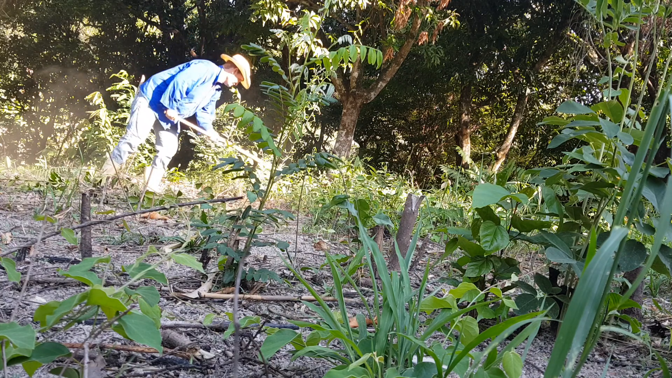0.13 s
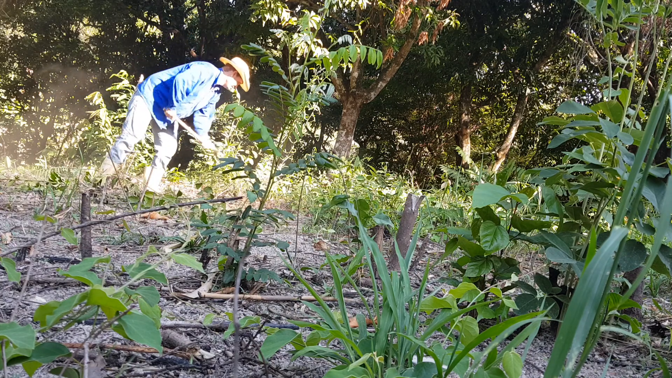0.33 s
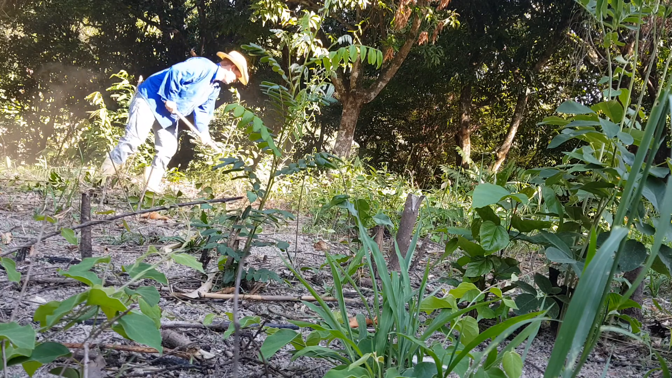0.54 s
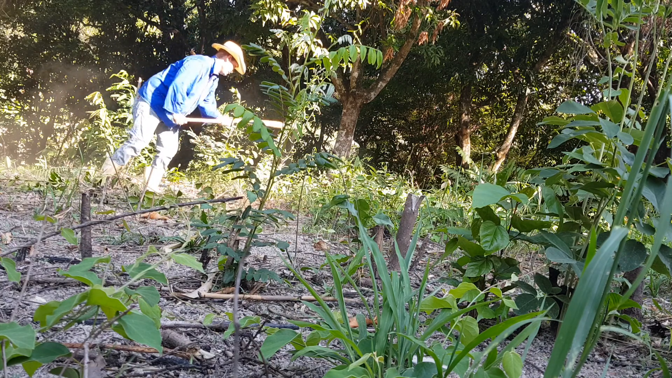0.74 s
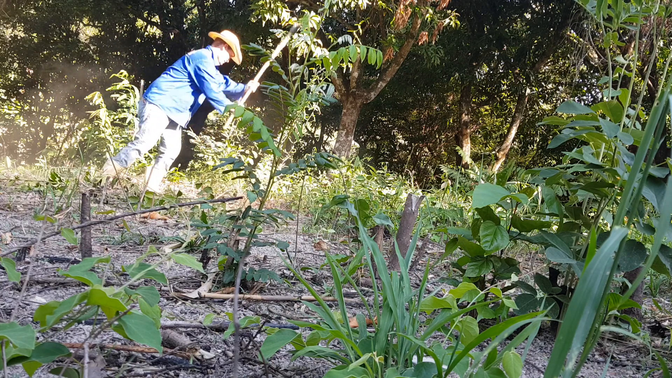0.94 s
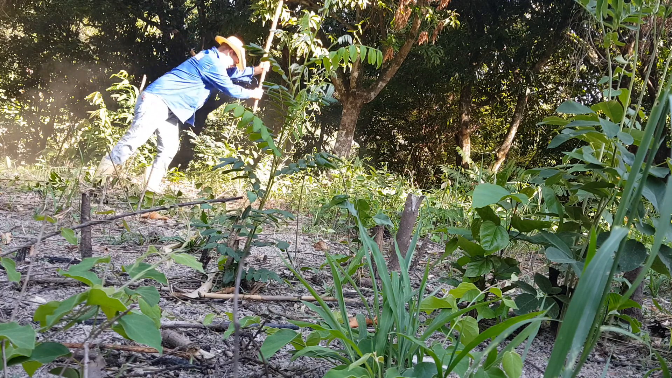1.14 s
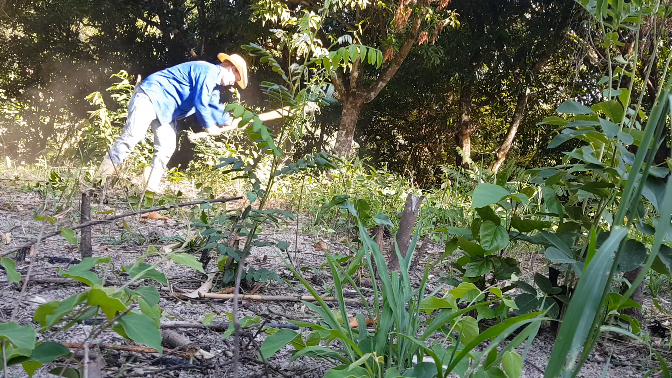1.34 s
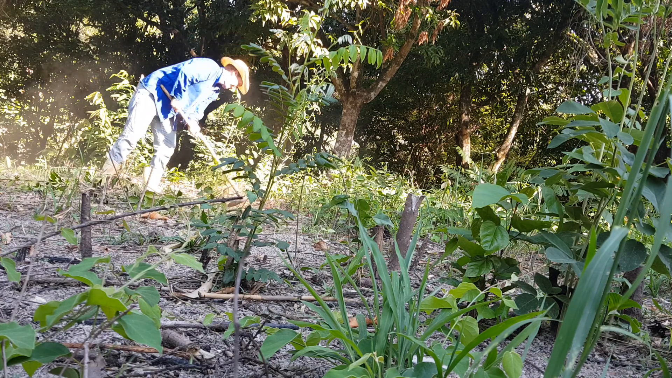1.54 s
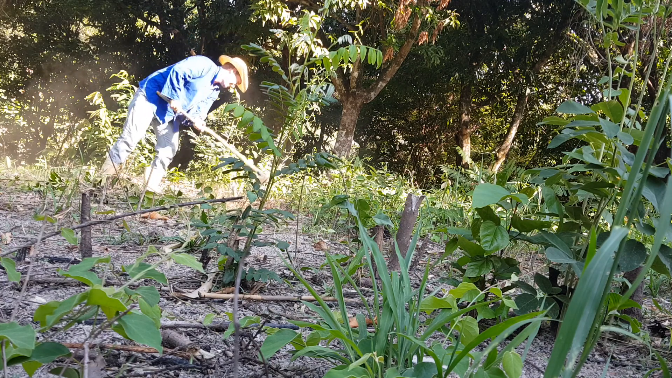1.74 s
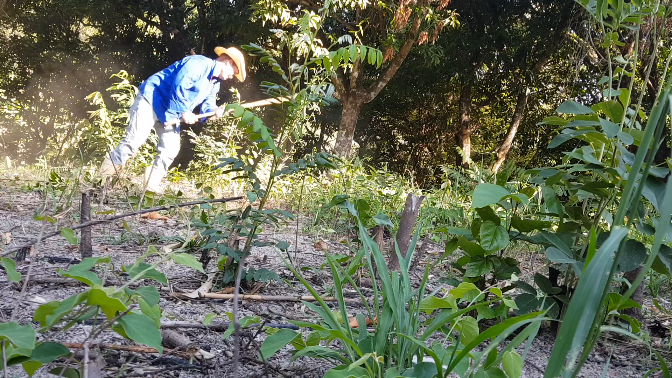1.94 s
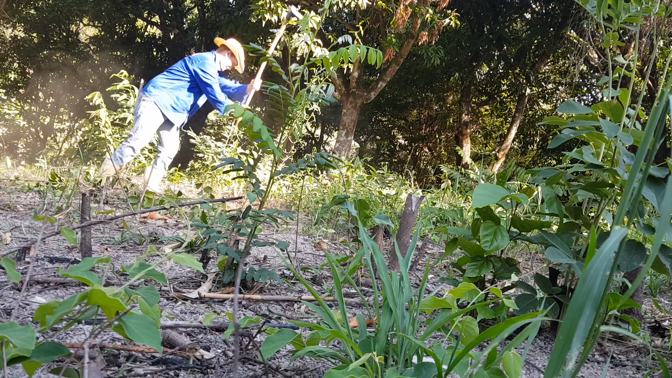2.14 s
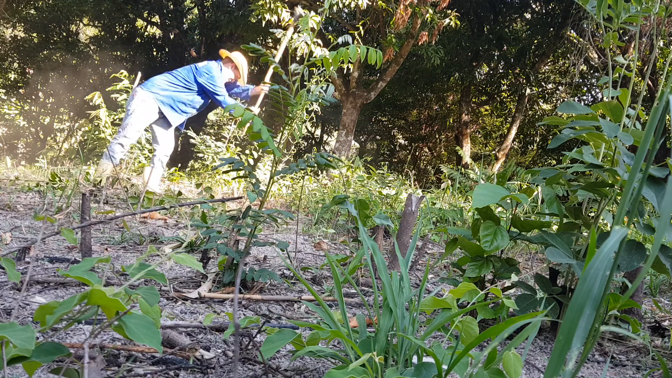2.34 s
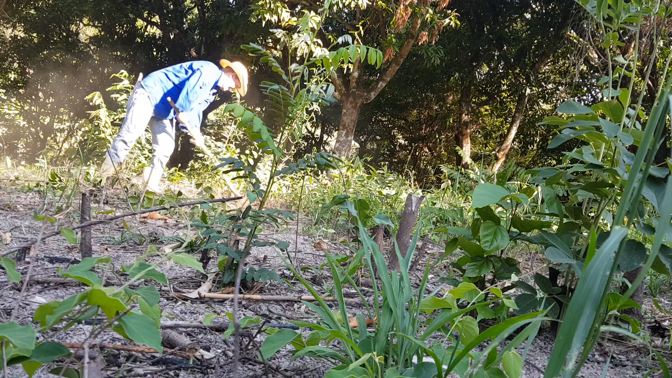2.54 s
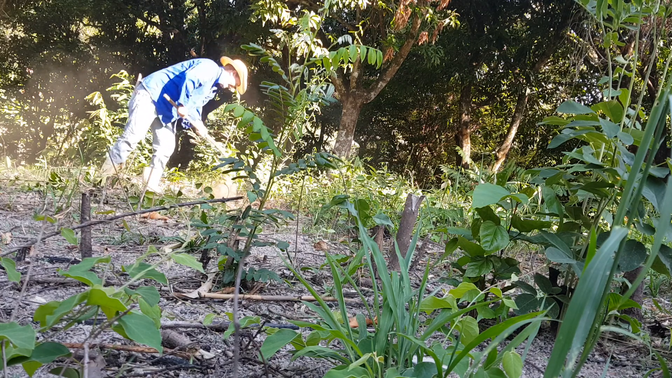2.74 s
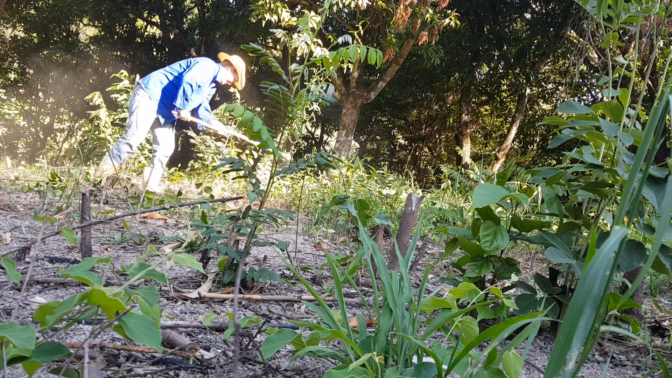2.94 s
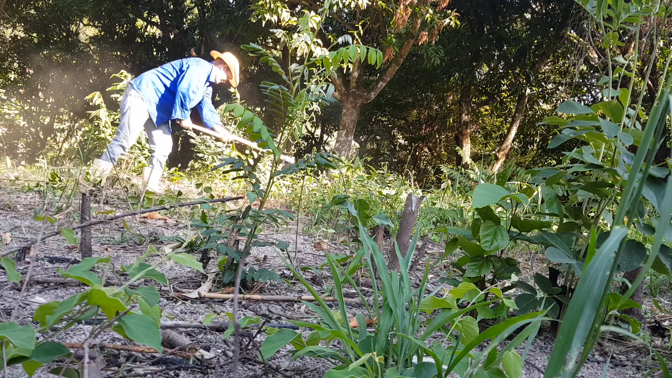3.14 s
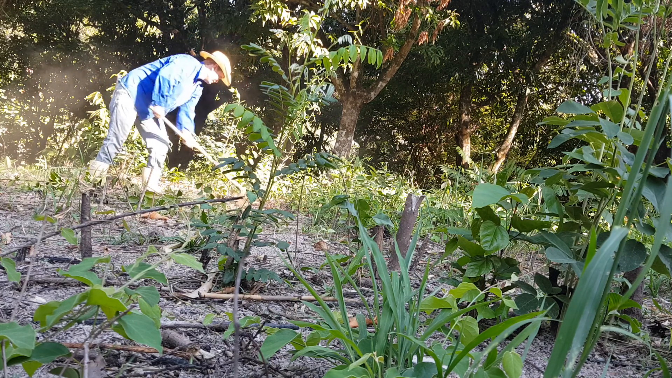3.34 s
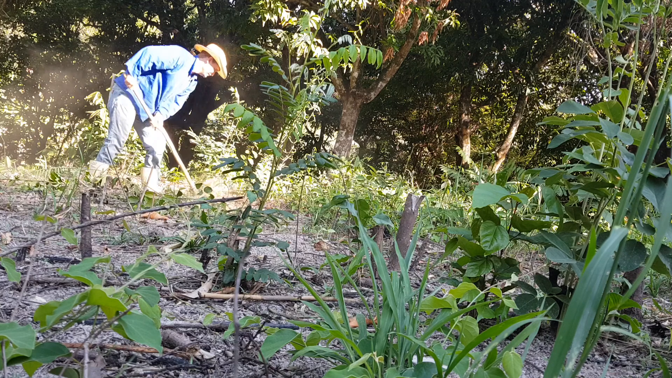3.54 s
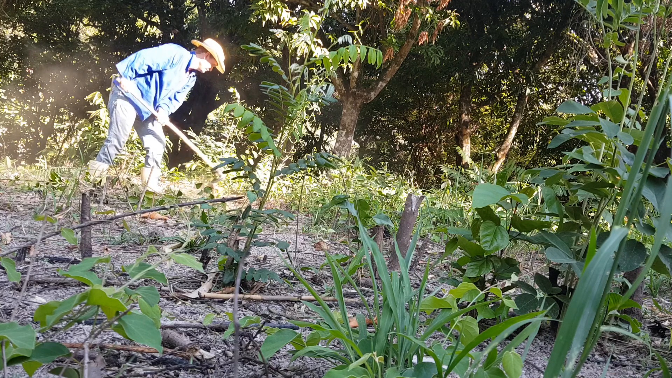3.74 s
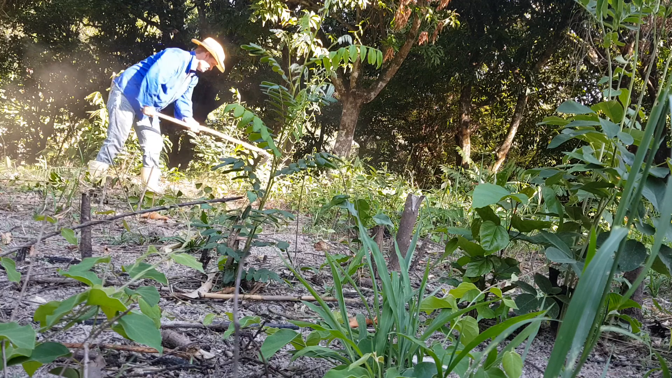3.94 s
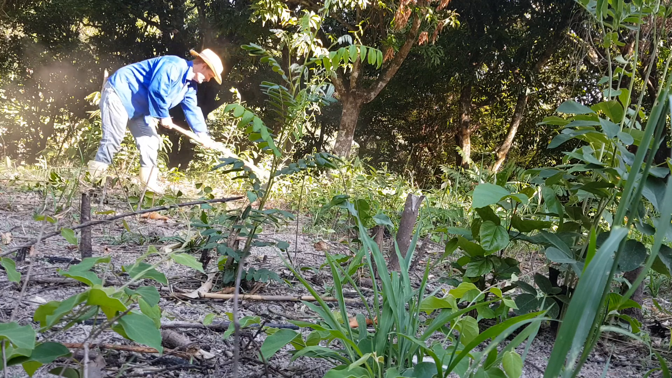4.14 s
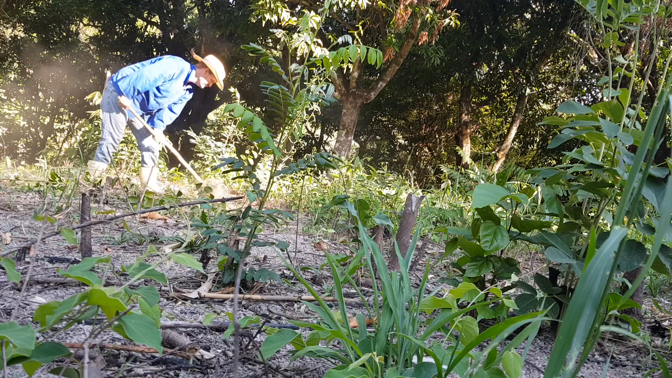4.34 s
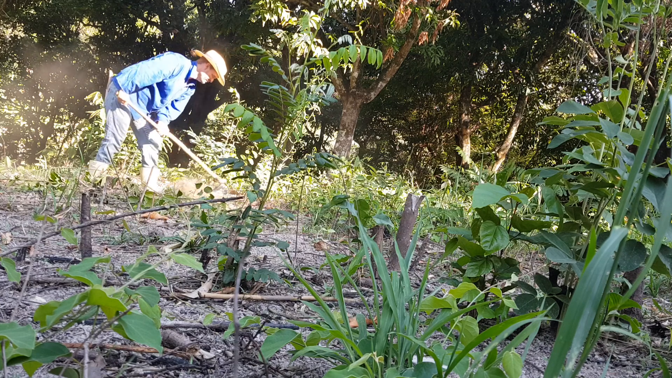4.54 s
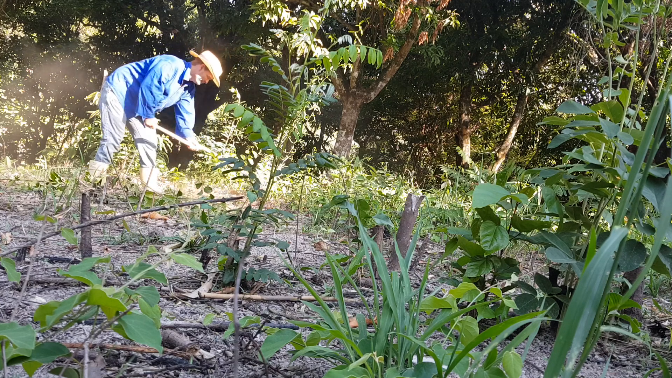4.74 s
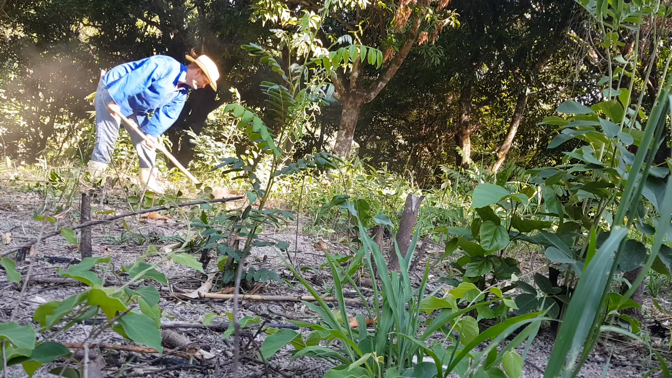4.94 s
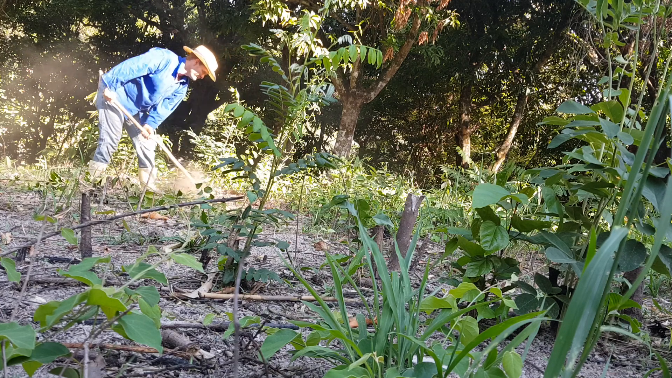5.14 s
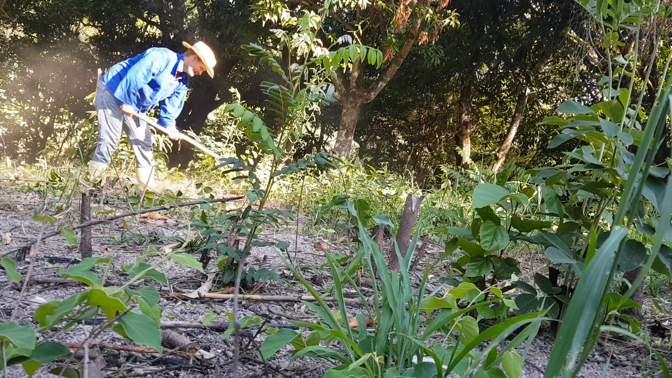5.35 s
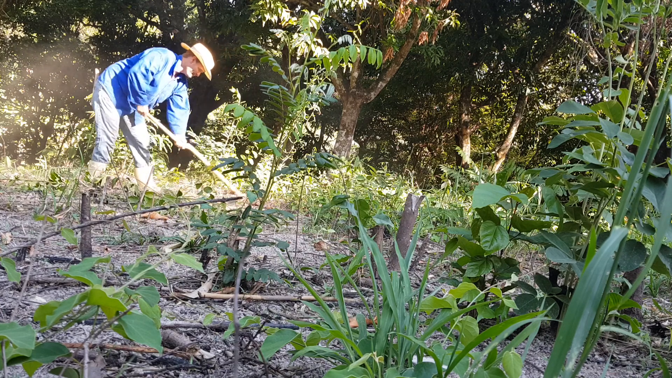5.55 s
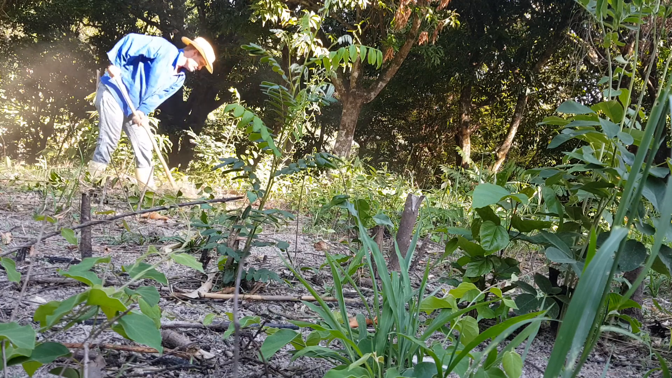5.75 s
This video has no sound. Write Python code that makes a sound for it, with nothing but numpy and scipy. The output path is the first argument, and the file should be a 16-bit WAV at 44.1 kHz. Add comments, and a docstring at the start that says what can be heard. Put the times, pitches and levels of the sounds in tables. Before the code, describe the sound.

At the edge of a wood, a hoe strikes dry ground: a muted chop, two hard crunching blows with a dull thump and brief metallic ring, a softer one, then a faint one and two small scrapes. Stalks snap and loose soil patters between. A distant bird whistles early on; insects drone thinly over quiet air. Stereo microphone at some distance, with a short echo from the trees.

```python
"""At the edge of a wood, a hoe chops dry soil: five blows of differing strength, then two scraping strokes.
Shaped noise makes the crust crack and the soil crunch; decaying sine tones make the blade ring,
the handle knock and the ground thump. Noise ticks and flows make stalks snap and loose earth patter.
The trees echo the work through decaying noise. A far bird whistles in gliding tones,
while narrow bands of noise drone like insects above a hush of air and leaves."""
import sys
import numpy as np
from scipy import signal
from scipy.fft import rfft, irfft
from scipy.io import wavfile
from scipy.ndimage import uniform_filter1d, map_coordinates

SR = 44100
rng = np.random.default_rng(int(sys.argv[2]) if len(sys.argv) > 2 else 0)


def file_out(sig):
    """Save sig as 16-bit WAV at sys.argv[1]."""
    # one column per channel
    cols = np.atleast_2d(sig).T
    # limit, then scale
    lim = np.clip(cols, -1, 1)
    pcm = np.round(lim * 32767).astype(np.int16)
    wavfile.write(sys.argv[1], SR, pcm)


N = 259308
T = np.arange(N) / SR  # time in seconds

# Levels in the tables are starting levels, before echo and the tone of the microphone ports.
# A t60 is the time in seconds to fade by 60 dB.
# Chops of the hoe: start_s, crack_db, crack_rise_s, crunch_db, crunch_t60_s,
# clod_db (compared with crack and crunch), blade_ring_db, thud_db, thud_pitch_hz, thud_delay_s
CHOPS = [(0.402, -36, 0.0065, -41, 0.19, -7.5, -60, -33, 73, 0.00756),
         (1.4564, -22, 0.0037, -31.5, 0.25, -1, -39.5, -19.5, 69, 0.0068),
         (2.578, -24, 0.0035, -31, 0.25, -0.5, -36.5, -28.5, 67.6, 0.003),
         (3.336, -27.5, 0.0069, -40.5, 0.72, -8.5, -51, -31.5, 80.7, 0.0177),
         (4.275, -42.5, 0.015, -44.5, 0.38, 0.5, -75, -43.5, 84.6, 0.012)]
# Shallow scraping strokes: start_s, length_s, crunch_db, clod_db
SCRAPING_STROKES = [(4.922, 0.1, -47, -45), (5.63, 0.062, -53.5, -52)]
# Stalks, roots and pebbles snapping under the blade: start_s, level_db, centre_hz
STALK_SNAPS = [(0.01, -45.5, 10800), (0.395, -40, 11000), (0.42, -36, 10900), (0.568, -51, 11000),
               (1.439, -32, 4730), (1.4556, -41, 4200), (1.4619, -28, 443), (2.552, -35, 5040),
               (2.576, -19.5, 2130), (2.584, -28, 700), (2.811, -44, 11900), (3.319, -36.5, 6500),
               (3.333, -40, 8200), (3.351, -35, 1280), (3.396, -36, 10900), (4.266, -41, 5200),
               (4.297, -37.5, 10000), (4.814, -54, 2600), (5.33, -45, 6460), (5.451, -42, 4400),
               (5.781, -35, 7700)]
# Tones of blade and handle: pitch_hz, level_db (compared with each other), t60_s
BLADE_TONES = [(439, 5.5, 0.27), (952, -8, 0.13), (1530, 9, 0.18), (1970, 1, 0.41), (2285, 3, 0.27),
               (3930, -5, 0.2), (4670, -3, 0.35), (6400, -6, 0.13), (12400, 1, 0.14)]
# Showers of flung soil: start_s, length_s, level_db (before thinning)
SOIL_SHOWERS = [(0.01, 0.27, -62.5), (0.592, 0.11, -60), (1.674, 0.25, -56.5), (2.803, 0.39, -54.5),
                (3.519, 0.35, -46.5), (5.778, 0.1, -49.5)]
# The blade drawn through loose earth and weeds: start_s, length_s, level_db
BLADE_DRAGS = [(0.37, 0.017, -54.5), (3.297, 0.02, -57.5), (3.8, 0.26, -66.5), (4.096, 0.064, -60),
               (4.251, 0.46, -54.5), (4.803, 0.11, -59), (5.06, 0.2, -57), (5.282, 0.14, -51),
               (5.503, 0.03, -65), (5.692, 0.2, -75)]
# Faint dry rustles as the hoe is lifted and swung: peak_s, level_db (of the grit)
SWING_RUSTLES = [(0.27, -70.5), (1.02, -67), (1.3, -69.5), (2.11, -66.5), (2.418, -66.5), (3.11, -64.5)]
# Falling whistles of the far bird: start_s, length_s, start_pitch_hz, end_pitch_hz, level_db
BIRD_WHISTLES = [(0.0, 0.09, 2240, 1716, -77), (0.457, 0.079, 2875, 2170, -63.5),
                 (0.932, 0.096, 2665, 2175, -68), (1.05, 0.11, 2290, 1860, -77.5),
                 (1.928, 0.17, 2622, 1800, -69.5), (2.426, 0.15, 2870, 2640, -70)]
# Insect bands: pitch_hz, width_hz (at half height), level_db (before swell and throb)
INSECT_BANDS = [(2920, 17, -83), (3048, 34, -75.5), (3365, 72, -69), (3510, 130, -77), (3561, 70, -72.5),
                (5060, 2800, -83)]
# Swell of the insect chorus: time_s, gain_db
CHORUS_SWELL = [(0, 4.5), (1.0, 3.5), (2.3, 1.5), (3.0, 3.5), (5.0, 2.5), (5.88, 7.5)]

# Tone colours, all with the columns: pitch_hz, level_db (only the shape matters)
# Cracking crust
CRACK_COLOUR = [(150, -65), (600, -4), (1500, -3), (2300, -17.5), (4200, 13.5), (7000, 3), (11000, 8.5),
                (16000, -5)]
# Crunching soil
CRUNCH_COLOUR = [(150, -50), (800, -3), (1600, -2.5), (2300, 2), (4500, 3), (6700, 2), (9000, 3),
                 (12000, -1.5), (16000, -8.5)]
# Breaking clods
CLOD_COLOUR = [(40, -10.5), (100, 2.5), (230, 3), (350, -1), (500, -1), (700, -6.5), (950, -1.5),
               (1600, -2.5), (2200, 2), (3500, -8.5), (8000, -10)]
# Fine dust on dry leaves
DUST_COLOUR = [(1500, -22), (5000, -6.5), (8000, 0), (10000, -0.5), (12500, -3), (16000, -9)]
# Rattling grit
GRIT_COLOUR = [(900, -45), (1600, -15), (2300, -1), (4200, 6), (6600, 3), (8000, -30), (11000, -24)]
# Rolling crumbs
CRUMB_COLOUR = [(40, -13), (100, -6.5), (300, 2.5), (700, -2), (1500, 0), (2500, 8), (5000, -41)]
# Echo from trunks and foliage
WOOD_COLOUR = [(35, -15.5), (70, -10), (150, -5), (400, -13), (1200, -3), (2300, 0.5), (5000, 0),
               (9000, -5.5), (16000, -3.5)]
# Hush of air and leaves
AIR_COLOUR = [(25, -14), (60, -3), (110, -10.5), (250, -8), (500, -13.5), (1000, -15.5), (1800, -18),
              (2600, -11), (3300, -5.5), (4200, -3), (5400, -8.5), (6700, -13), (7600, -29), (12000, -25.5),
              (16000, -27.5)]
# Tone of the two microphone ports: pitch_hz, left_db, right_db
PORT_COLOURS = [(99, 0.5, 0), (688, -2.6, -2.15), (1954, -3, -1.33), (6800, 1, 3), (8040, -5, -13),
                (7810, -9.5, -5.5), (9570, 1.5, -9), (10340, 3.5, -2), (13850, 6.5, 5.5), (16500, 0.5, 4)]
# The hoe works its way to the left: time_s, right_port_lag_samples
RIGHT_PORT_LAG = [(0, 3.6), (3.3, 3.15), (4.5, 4.43), (5.88, 5.7)]

# A scrape bites with a small crack (dB re its crunch), gathers clods, and stops with a thud (dB re its clods)
BITE_S, GATHER_S, SCRAPE_T60_S = 0.0015, 0.057, 0.18
SCRAPE_CRACK_DB, SCRAPE_THUD_DB, SCRAPE_THUD_HZ = 2, -3, 86
SNAP_T60_S = 0.028
# A shower builds, thins steadily while it falls, and stops
SHOWER_ATTACK_S, SHOWER_THINNING_DB_PER_S, SHOWER_T60_S = 0.089, 42, 0.49
DRAG_ATTACK_S, DRAG_T60_S = 0.012, 0.55
RUSTLE_WIDTH_S, RUSTLE_DUST_DB = 0.053, -12.5  # dust in a rustle, dB re its grit
# Flow strengths before colouring: grit in dB re dust; crumbs grow with the square of the flow
# and reach CRUMBS_DB when the flow is at FULL_FLOW_DB
SHOWER_GRIT_DB, DRAG_GRIT_DB, CRUMBS_DB, FULL_FLOW_DB = -6, -4, -62, -46.5
PEBBLE_RATE, PEBBLE_DB = 16, -0.5  # average ticks per second; dB re dust for the hardest single tick
THROB_RATE, THROB_DB = 24, 2  # insect wing strokes per second; how far they move the level up and down
LOW_CUT_HZ, TOP_HZ = 37, 16000


def hoe():
    """The crust cracks, soil crunches along the blade, clods break, the ground thumps; a scrape draws this out."""
    crack, crunch, clod, push, ground, shake = np.zeros((6, N))
    for (s, crack_db, rise_s, crunch_db, t60, clod_db,
         ring_db, thud_db, thud_hz, delay_s) in CHOPS:
        entry = undb(crack_db) * strike(s, rise_s, 0.03)
        cut = undb(crunch_db) * strike(s + 0.0049, 0.0033, t60)
        crack += entry
        crunch += cut
        clod += undb(clod_db) * (0.44 * entry + 0.86 * cut)
        push[int(s * SR)] = undb(ring_db)  # a single click that sets the blade ringing
        ground += undb(thud_db) * thud(s + delay_s, thud_hz)
        ground += undb(ring_db + 8) * knock(s + 0.00307)
        shake += undb(thud_db) * strike(s + 0.0057, 0.0057, 0.41)
    for s, length, crunch_db, clod_db in SCRAPING_STROKES:
        contact = stroke(s, length, BITE_S, SCRAPE_T60_S)
        gathering = np.clip((T - s) / GATHER_S, 0, 1) ** 0.5
        crack += undb(crunch_db + SCRAPE_CRACK_DB) * strike(s, BITE_S, 0.04)
        crunch += undb(crunch_db) * contact
        clod += undb(clod_db) * contact * gathering
        ground += undb(clod_db + SCRAPE_THUD_DB) * thud(s + length, SCRAPE_THUD_HZ)
    crust = colour(crack * grains(2.7, scatter=0.04), CRACK_COLOUR)
    soil = colour(crunch * grains(2.6, scatter=0.74), CRUNCH_COLOUR)
    lumps = colour(clod * grains(3.5, scatter=0.03), CLOD_COLOUR)
    rumble = undb(-16) * shake * band(62, 45)
    return crust + soil + lumps + place(blade(push) + ground + rumble)


def blade(push):
    """The steel and its handle ring as fading sine tones, quickly damped by the earth."""
    t = T[:SR // 2]
    ring = np.zeros(len(t))
    for hz, db, t60 in BLADE_TONES:
        phase = rng.uniform(0, 2 * np.pi)
        ring += undb(db - 60 * t / t60) * np.sin(2 * np.pi * hz * t + phase)
    # balance by the combined strength of the tones
    return convolve(push, ring / np.linalg.norm(undb([tone[1] for tone in BLADE_TONES])))


def thud(s, hz, t60=0.14, stiffening=2.05, settle_s=0.0053):
    """The ground bounces under the blow; its pitch sinks to hz as the soil gives way."""
    t = np.maximum(T - s, 0)
    cycles = hz * (t + stiffening * settle_s * (1 - np.exp(-t / settle_s)))
    return np.sin(2 * np.pi * cycles) * (1 - np.exp(-t / 0.0073)) * undb(-60 * t / t60)


def knock(s, hz=235, t60=0.068):
    """The wooden handle gives a dull knock as the blade stops: one short, fading tone."""
    t = np.maximum(T - s, 0)
    return np.sin(2 * np.pi * hz * t) * (1 - np.exp(-t / 0.0015)) * undb(-60 * t / t60)


def snaps(octaves=0.46):
    """Each snap is a short, broad tick of noise; smaller things tick higher."""
    out, chips = np.zeros((2, N)), grains(0.61, scatter=0.35)
    t = T[:SR // 20]
    for s, db, hz in STALK_SNAPS:
        start = int(s * SR)
        span = slice(start, start + len(t))
        edges = [hz / 2 ** octaves, min(hz * 2 ** octaves, SR * 0.45)]
        band_filter = signal.butter(1, edges, "band", fs=SR, output="sos")
        tick = signal.sosfilt(band_filter, chips[:, span])
        out[:, span] += unit(tick) * undb(db - 60 * t / SNAP_T60_S)
    return out


def loose_earth():
    """Dragged and thrown soil: fine dust hisses on dry leaves, grit rattles, crumbs roll."""
    dust, grit, crumbs = earth_flow()
    dust = dust * (1 + undb(PEBBLE_DB) * pebbles())
    hiss = undb(2.3) * colour(dust * grains(1.0, scatter=0.78), DUST_COLOUR)
    rattle = undb(3.5) * colour(grit * grains(1.7, scatter=0.74), GRIT_COLOUR)
    roll = undb(4.5) * colour(crumbs * grains(0.99, scatter=0.16), CRUMB_COLOUR)
    # the soil lets go in small, uneven spills
    spills = undb(0.7 * walk(45) + 0.9 * walk(260))
    return (hiss + rattle + roll) * spills


def earth_flow():
    """Strengths of dust, grit and crumbs as the powers of showers, drags and rustles add up."""
    showers, drags, rustles = np.zeros((3, N))
    for s, length, db in SOIL_SHOWERS:
        thinning_db = SHOWER_THINNING_DB_PER_S * np.maximum(T - s, 0)
        showers += (undb(db - thinning_db) * stroke(s, length, SHOWER_ATTACK_S, SHOWER_T60_S)) ** 2
    for s, length, db in BLADE_DRAGS:
        drags += (undb(db) * stroke(s, length, DRAG_ATTACK_S, DRAG_T60_S)) ** 2
    for s, db in SWING_RUSTLES:
        rustles += (undb(db) * np.exp(-0.5 * ((T - s) / RUSTLE_WIDTH_S) ** 2)) ** 2
    dust = np.sqrt(showers + drags + undb(RUSTLE_DUST_DB) ** 2 * rustles)
    grit = np.sqrt(undb(SHOWER_GRIT_DB) ** 2 * showers + undb(DRAG_GRIT_DB) ** 2 * drags + rustles)
    crumbs = undb(CRUMBS_DB) * (showers + drags) / undb(FULL_FLOW_DB) ** 2
    return dust, grit, crumbs


def pebbles(t60=0.0045):
    """Stray pebbles tick in the moving earth: short fading envelopes at random moments."""
    chance, size = rng.random((2, N))
    return convolve((chance < PEBBLE_RATE / SR) * size, undb(-60 * T[:SR // 10] / t60))[0]


def trees(x, t60, build_s):
    """Diffuse echo from trunks and foliage: fading noise, different on each side."""
    t = T[:SR]
    tails = rng.standard_normal((2, SR)) * undb(-60 * t / t60) * (1 - np.exp(-t / build_s))
    tails /= np.linalg.norm(tails, axis=1, keepdims=True)
    return colour(convolve(x, tails), WOOD_COLOUR)


def bird():
    """Thin falling whistles, gliding sines from deep among the trees, heard with much echo."""
    song = np.zeros(N)
    for s, length, start_hz, end_hz, db in BIRD_WHISTLES:
        along = np.clip((T - s) / length, 0, 1)
        hz = start_hz + (end_hz - start_hz) * along + 50 * walk(450)  # slightly unsteady pitch
        loudness = undb(db) * np.sqrt(np.abs(np.sin(np.pi * along)))
        song += loudness * np.sin(2 * np.pi * np.cumsum(hz) / SR)
    return undb(2.5) * song + undb(2.5) * trees(song, t60=0.92, build_s=0.0043)


def field():
    """Many insects merge into narrow, throbbing bands of noise above the hush of air and leaves."""
    swell = undb(np.interp(T, *np.transpose(CHORUS_SWELL)))
    throb = undb(THROB_DB * np.sin(2 * np.pi * THROB_RATE * T + 2 * walk(6)))
    insects = np.zeros((2, N))
    for side in insects:
        for hz, width_hz, db in INSECT_BANDS:
            side += undb(db + 0.74 * walk(2.98)) * band(hz, width_hz)
    air = undb(-65.5 + 0.5 * walk(4.46)) * colour(rng.standard_normal((2, N)), AIR_COLOUR)
    # the far low rumble is alike on both sides
    return swell * throb * insects + air + undb(-79.0) * band(85, 130)


def grains(spread_db, scatter, size=14):
    """Dense fracture bursts, many faint, few strong; ground and leaves scatter a share differently to each side."""
    strength = undb(spread_db * np.minimum(rng.exponential(size=N // size + 1), 4))
    bursts = unit(np.repeat(strength, size)[:N])
    direct, left, right = (crumbling(patchy_db=2.6) for _ in range(3))
    share = np.clip(scatter, 0, 1)
    return bursts * (np.sqrt(1 - share) * place(direct) + np.sqrt(share) * np.array([left, right]))


def crumbling(patchy_db, size=1024):
    """Noise with brief chance resonances, as ever new clods and leaves take part."""
    frames = signal.stft(rng.standard_normal(N), nperseg=size)[2]
    patches = rng.standard_normal(frames.shape)
    patches = uniform_filter1d(patches, size=4, axis=0)  # smooth over pitch
    patches = uniform_filter1d(patches, size=6, axis=1)  # smooth over time
    return unit(signal.istft(frames * undb(patchy_db * unit(patches)), nperseg=size)[1][:N])


def strike(s, rise_s, t60):
    """Envelope that swells up to time s and dies away."""
    return np.exp(np.minimum((T - s) / rise_s, (s - T) * np.log(1000) / t60))


def stroke(s, length, attack_s, t60):
    """Envelope that swells up to time s, holds and dies away."""
    swell = (T - s) / attack_s
    fade = (s + length - T) * np.log(1000) / t60
    return np.exp(np.minimum(0, np.minimum(swell, fade)))


def place(x):
    """Sound straight from the hoe meets the left port first, so the right one is delayed."""
    x = np.ravel(x)
    lag = np.interp(T, *np.transpose(RIGHT_PORT_LAG))
    return np.array([x, map_coordinates(x, [np.arange(N) - lag], order=3)])


def band(hz, width_hz):
    """Noise in one steep resonance, rms 1."""
    bins = np.arange(N // 2 + 1) * SR / N
    resonance = 1 / (1 + ((bins - hz) / width_hz * 2) ** 2)
    return unit(irfft(rfft(rng.standard_normal(N)) * resonance, N))


def walk(rate):
    """Random wander, rms 1, through rate random points per second joined by straight lines."""
    knots = rng.standard_normal(N // 100)
    return unit(np.interp(T * rate, np.arange(len(knots)), knots))


def colour(x, points):
    """Give x a spectrum; white noise keeps its power."""
    h = response(points)
    return convolve(x, h / np.linalg.norm(h))


def response(points, size=8192):
    """Impulse response of a (Hz, dB) spectrum that acts only after its input."""
    hz, db = np.transpose(points)
    bins = np.maximum(np.arange(size // 2 + 1) * SR / size, 1)
    gain = undb(np.interp(np.log(bins), np.log(hz), db))
    # folding the cepstrum gives the smallest possible delay
    cepstrum = irfft(np.log(gain))
    cepstrum[1:size // 2] *= 2
    cepstrum[size // 2 + 1:] = 0
    return irfft(np.exp(rfft(cepstrum)))


def convolve(x, h):
    """Pass one or two channels through an impulse response."""
    return signal.fftconvolve(np.atleast_2d(x), np.atleast_2d(h), axes=1)[:, :N]


def unit(x):
    """Scale to rms 1."""
    return x / np.sqrt(np.mean(x ** 2))


def undb(db):
    """Decibels to gain."""
    return 10 ** (np.asarray(db) / 20)


def scene():
    """The work, its echo from the trees, the loose earth, the bird and the living field."""
    work = hoe() + snaps()
    echo = undb(-12) * trees(work[0], t60=0.45, build_s=0.0043)
    return work + echo + loose_earth() + bird() + field()


def record(dry):
    """Each microphone port has its own notch in the treble; the deepest bass and the very top are cut."""
    hz, *sides = np.transpose(PORT_COLOURS)
    heard = convolve(dry, [response(np.column_stack([hz, db])) for db in sides])
    heard = signal.sosfilt(signal.butter(6, LOW_CUT_HZ, "high", fs=SR, output="sos"), heard)
    return signal.sosfilt(signal.ellip(10, 0.2, 80, TOP_HZ, fs=SR, output="sos"), heard)


dry = scene()
out = record(dry)
file_out(out)
```